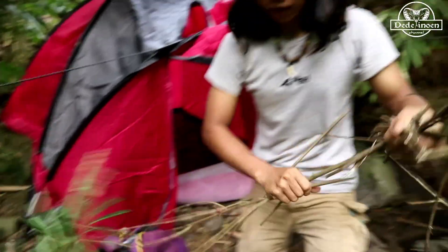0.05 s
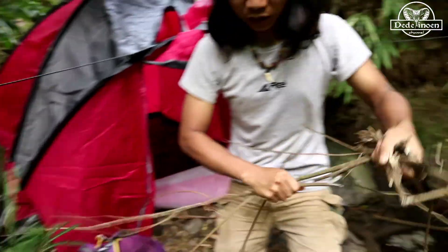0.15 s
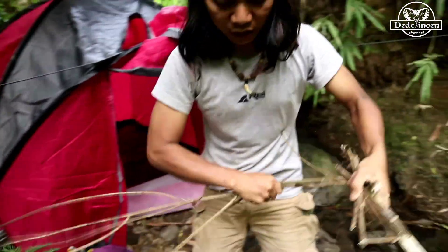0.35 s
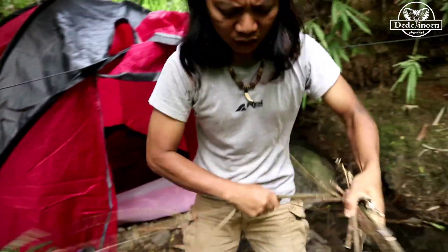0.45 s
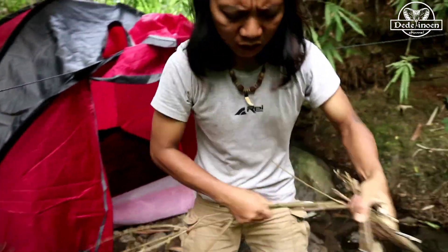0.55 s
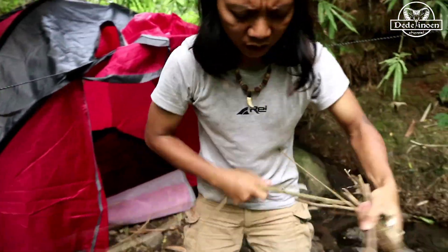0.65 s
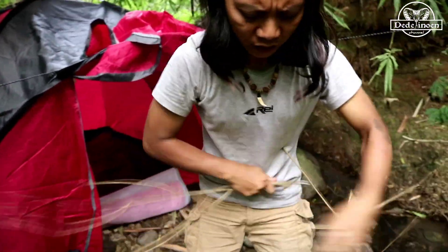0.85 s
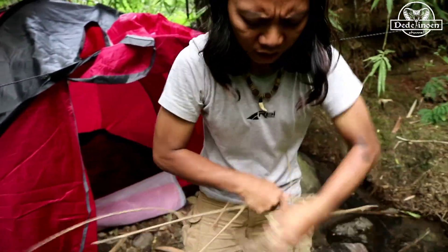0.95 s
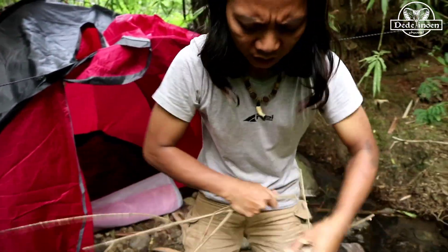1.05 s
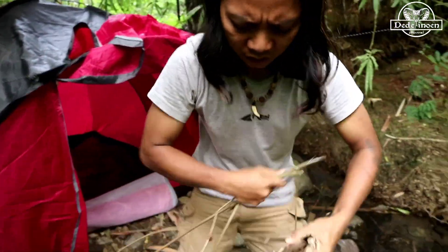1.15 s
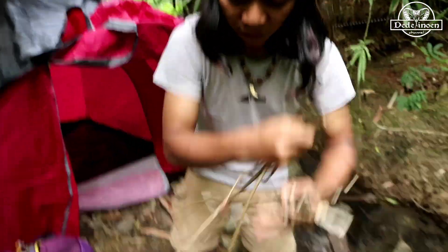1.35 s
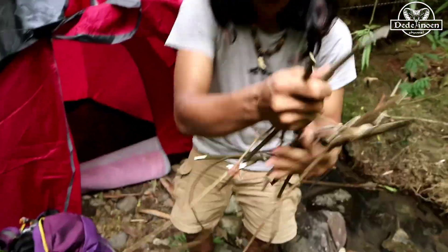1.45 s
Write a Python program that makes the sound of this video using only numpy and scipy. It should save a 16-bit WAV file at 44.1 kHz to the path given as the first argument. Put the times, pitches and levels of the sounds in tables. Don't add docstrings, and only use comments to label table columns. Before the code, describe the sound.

Dry twigs snap by hand very close to the microphone: one crack at once, a rapid cluster soon after, another loud break past one second, then small ticks and faint rustle over quiet forest hiss.

```python
import sys
import numpy as np
from scipy import signal
from scipy.io import wavfile
from scipy.ndimage import uniform_filter1d

SR = 44100
rng = np.random.default_rng(int(sys.argv[2]) if len(sys.argv) > 2 else 0)


def nominal_scale(level):
    x = np.asarray(level, float) / 20
    return 10 ** x


def store_pcm(level_fs):
    pcm = np.round(np.clip(level_fs, -1, 1) * 32767).astype(np.int16)
    wavfile.write(sys.argv[1], SR, np.atleast_2d(pcm).T)


N = 66150
LEAD = 2000

# pitch_hz, level_db (per Hz)
HISS_COLOUR = [(25, -18), (50, -9), (250, -1), (750, -2), (1400, -0.5), (5000, 0), (12000, -7.5),
               (16000, -13.5)]
BREAK_S = [-.012, .1785, .2069, .2163, .3265, .4294, .4327, .4922, .498, 1.0592, 1.0635, 1.0912, 1.094,
           .3274, .332, .2174, .3254, .2164, .4937, 1.0604]
# peak_db, ring_hz, tearing_s, splinter_db
BREAKS = [(2, 6470, 0.0041, -0.5), (-21, 5500, 0.0062, -13.5), (-10.5, 8200, .0004, 1.5),
          (2.5, 8500, 0.0052, 1.5), (-3, 10000, 0.00049, -5), (-20.5, 6300, 0.00022, -4),
          (-20, 13400, .0005, 5), (-15, 3000, 0.0016, -2.5), (-20, 3600, 0.0049, -8),
          (4.5, 9200, 0.00067, 8), (-11, 5120, 0.0075, -10), (-14, 9600, 0.0028, -8),
          (-21.5, 5600, 0.0095, -1), (-7.5, 5500, 0.0005, -5.5), (-21, 4600, 0.0028, -22),
          (0, 5070, 0.0004, -13), (-24, 9100, 0.0021, -21), (4.5, 13360, 0.0016, -10.5),
          (-10, 3200, 0.0005, 1), (-0.5, 2920, 0.00059, -5)]
# pitch_hz, level_db (per Hz)
SPLINTER_COLOUR = [(60, -35), (400, -20.5), (1500, -6), (4500, -3.5), (8000, -6), (14000, -5.5),
                   (16000, -12.5)]
KNOCK_S = [.0389, .0562, .1378, .149, .2005, .2125, .2872, .2065, .3715, .381, .3715, .5465, .5685, .6027,
           .647, .7815, .783, .802, .822, .844, .868, .965, .974, 1.0258, 1.1415, 1.2115, 1.301, 1.393,
           1.405, 1.4321, .548, .2885, 1.0925, 1.0915]
# peak_db, centre_hz, length_s
KNOCKS = [(-29, 12000, .00066), (-38, 7000, .0008), (-41, 4000, .00027), (-36.5, 3030, .0039),
          (-27, 9200, .0029), (-30, 7000, .0012), (-31.5, 1370, .0024), (-24, 8000, .0013),
          (-34, 7000, .0004), (-34, 6500, .0004), (-49, 894, .0011), (-37, 1050, .002), (-48.5, 520, .006),
          (-33, 5360, .00084), (-37.5, 4970, .001), (-28, 5300, .0015), (-46, 706, .0018),
          (-40, 5500, .001), (-37, 9100, 0.0014), (-37, 2500, .0038), (-46, 2200, .0033),
          (-38, 2430, .0015), (-35, 2260, .0017), (-40, 6000, .00044), (-33, 13000, .0006),
          (-33, 6000, .0012), (-34, 10500, 0.00082), (-46, 9000, .00063), (-43.5, 2404, 0.00074),
          (-38, 1580, .00037), (-43, 330, .003), (-50, 250, .002), (-14, 8930, .0005), (-22, 2300, .001)]
FIBRE_S = [.42945, .4732, .477, .485, .4885, .1794, .184, .175, .711, .547, .832, 1.033, 1.204, 1.32, 1.432,
           1.481, 1.2113, 1.0258, 1.4325, .7818, 1.3008, 1.4415]
# peak_db, centre_hz
FIBRES = [(-4, 6880), (-25, 7000), (-33, 14000), (-36, 10500), (-34, 14060), (-15.5, 6360), (-24, 5300),
          (-36, 6040), (-46, 2800), (-39, 14000), (-40, 7500), (-43, 13900), (-40, 4500), (-38, 4500),
          (-38, 13500), (-46, 1440), (-29, 3000), (-40, 3000), (-36, 3500), (-26, 5500), (-36, 5000),
          (-43, 3000)]
# break_index, peak_db, pitch_hz, t60_s
STEM_MODES = [(3, -14, 773, 0.016), (3, -10.5, 1213, 0.011), (3, -13, 1720, .012), (3, -24.5, 368, 0.018),
              (9, -3.5, 2297, 0.014), (9, -10, 993, 0.015), (9, -16.5, 530, .012), (7, -39, 450, 0.031),
              (7, -20, 1763, 0.013), (7, -44, 2130, 0.0068), (4, -27, 860, 0.012), (4, -23.5, 1330, 0.014),
              (4, -39.5, 600, 0.016), (9, -0.5, 3070, .012), (19, -5.5, 3125, .012), (9, -9.5, 4400, 0.02),
              (9, -7, 5300, 0.017), (9, -7, 5800, 0.021), (9, -14.5, 8470, 0.018), (9, -3.5, 10000, .01),
              (15, -2, 4960, .014), (3, -6.5, 7070, 0.032), (15, -9, 9550, 0.027), (15, -9, 4200, 0.019),
              (3, -27, 330, .01), (18, -22, 4010, 0.014), (18, -18, 2200, .007), (18, -18, 3000, 0.0055),
              (18, -20, 4900, .008), (19, -16, 800, .014), (3, -22, 560, .012), (5, -50, 420, .02),
              (4, -6, 6340, 0.0079), (4, -23, 2240, 0.0078), (4, -25, 3310, 0.011)]
# middle_s, half_length_s, level_db, centre_hz
DRAGS = [(0.084, 0.14, -60, 3050), (0.148, 0.018, -54.5, 9000), (0.186, 0.032, -53.5, 5500),
         (0.244, 0.028, -51.5, 760), (0.554, 0.066, -59, 4620), (0.549, 0.011, -53.5, 370),
         (0.608, 0.011, -55, 3860), (0.69, 0.017, -64, 4550), (0.741, 0.02, -78.5, 6000),
         (0.787, 0.015, -55, 2950), (0.836, 0.033, -54.5, 1900), (0.85, 0.024, -52, 3670),
         (0.879, 0.022, -52.5, 2380), (0.905, 0.014, -57.5, 7600), (0.943, 0.016, -60.5, 8700),
         (0.99, 0.0099, -58, 10000), (1.003, 0.014, -58, 9000), (1.099, 0.016, -48.5, 690),
         (1.147, 0.02, -49, 3010), (1.217, 0.038, -55, 3090), (1.317, 0.036, -58.5, 4120),
         (1.353, 0.013, -66, 4850), (1.422, 0.023, -62, 5000), (1.446, 0.024, -58.5, 8100),
         (1.467, 0.019, -68.5, 304), (1.492, 0.024, -57.5, 5460), (0.03, 0.06, -62, 450),
         (0.14, 0.04, -64, 500), (0.503, 0.008, -47, 4000), (0.602, 0.003, -52, 11000)]
# pitch_hz, level_db (per Hz)
LEAF_COLOUR = [(150, -35.5), (600, -0.5), (2300, -3), (6000, 0), (12000, -10.5), (16000, -5)]
# pitch_hz, t60_s
BUSH_T60 = [(300, .3), (1500, 0.4), (5000, 0.56), (10000, 0.41), (16000, 0.33)]
# pitch_hz, gain_db
ECHO_COLOUR = [(100, -5.5), (600, -6.5), (2000, -10), (5500, -4.5), (10000, -7), (16000, -4)]

RING_Q, TICK_Q, POP_Q = 1.71, 0.9, 1.5
SENT_Q = 0.79


def evened(x):
    return x / np.sqrt(np.mean(x ** 2) + 1e-20)


def colour(points):
    f, db = np.transpose(points)
    hz = np.abs(np.fft.fftfreq(4096, 1 / SR))
    gain_db = np.interp(np.log(hz + 1), np.log(f + 1), db)
    log_gain = np.log(nominal_scale(np.maximum(gain_db, -90)))
    phase = -signal.hilbert(log_gain).imag
    taps = np.fft.ifft(np.exp(log_gain + 1j * phase)).real[:2048]
    return taps / np.linalg.norm(taps)


def ring(x, hz, width_hz):
    r = np.exp(-np.pi * width_hz / SR)
    gain = np.sqrt(1 - r * r)
    return signal.lfilter([gain, 0, -r * gain], [1, -2 * r * np.cos(2 * np.pi * hz / SR), r * r], x)


def steep(x, hz, q):
    twice = ring(ring(x, hz, hz / q), hz, hz / q)
    return twice * np.sqrt(2 * hz / q / SR)


def impulse(length):
    return 1. * (np.arange(length) == 0)


def add(mix, start_s, sound):
    part = mix[..., round(start_s * SR) + LEAD:][..., :sound.shape[-1]]
    part += sound[..., :part.shape[-1]]


def place(mix, path, start_s, peak_db, drive, body, q):
    sound = body(drive, q)
    click = body(impulse(len(drive)), min(q, SENT_Q))
    sound = nominal_scale(peak_db) * sound / np.abs(sound).max()
    add(mix[0], start_s, sound)
    add(mix[1 + path % 3], start_s, click * np.linalg.norm(sound) / np.linalg.norm(click))


def break_paths():
    return np.argsort(np.argsort(BREAK_S))


def forest():
    noise = rng.standard_normal(N + LEAD)
    return nominal_scale(-60.5) * evened(signal.oaconvolve(noise, colour(HISS_COLOUR))[:N + LEAD])


def tear(length_s, chance):
    rise_s, sag_db, fall_db, fall_s, spiky_db = 0.00023, -6, -61.5, 0.011, 3.5
    t = np.arange(chance.shape[1]) / SR
    hold = sag_db * np.minimum(t / length_s, 1)
    fall = fall_db * np.maximum(t - length_s, 0) / (fall_s * np.sqrt(length_s / 0.0014))
    spikes = nominal_scale(spiky_db * evened(uniform_filter1d(chance[1], size=12)))
    return np.minimum(t / rise_s, 1) * nominal_scale(hold + fall) * chance[0] * spikes


def breaks(mix, chance):
    spray, paths = colour(SPLINTER_COLOUR), break_paths()
    for k, (start_s, (db, hz, length_s, splinter_db), c) in enumerate(zip(BREAK_S, BREAKS, chance)):
        thin = signal.butter(2, 0.19 * hz, "high", fs=SR)

        def twig(x, q):
            splinters = signal.oaconvolve(x, spray)[:len(x)]
            return signal.lfilter(*thin, steep(x, hz, q) + nominal_scale(splinter_db) * splinters)

        place(mix, paths[k], start_s, db, tear(length_s, c), twig, RING_Q)


def ticks(mix, chance):
    for k, (start_s, (db, hz, length_s), c) in enumerate(zip(KNOCK_S, KNOCKS, chance)):
        place(mix, k, start_s, db, tear(length_s, c), lambda x, q: steep(x, hz, q), TICK_Q)


def pops(mix):
    for k, (start_s, (db, hz)) in enumerate(zip(FIBRE_S, FIBRES)):
        place(mix, k, start_s, db, impulse(600), lambda x, q: steep(x, hz, q), POP_Q)


def twigs():
    mix = np.zeros((4, N + LEAD))
    chance = rng.standard_normal((80, 2, 1800))
    breaks(mix, chance)
    ticks(mix, chance[20:])
    pops(mix)
    return mix


def stems():
    mix, t, paths = np.zeros((4, N + LEAD)), np.arange(1500) / SR, break_paths()
    for k, db, hz, t60_s in STEM_MODES:
        swell = np.minimum(t / .0007, 1)
        mode = nominal_scale(db - 60 * t / t60_s) * np.sin(2 * np.pi * hz * t) * swell
        click = steep(impulse(len(t)), hz, SENT_Q)
        add(mix[0], BREAK_S[k], mode)
        sent = nominal_scale(-6) * click * np.linalg.norm(mode) / np.linalg.norm(click)
        add(mix[1 + paths[k] % 3], BREAK_S[k], sent)
    return mix


def rustle():
    grains_per_s, grain_db, wide_db, q = 4500, 2.3, 0.1, 0.71
    n, out = N + LEAD, np.zeros(N + LEAD)
    size = nominal_scale(grain_db * np.minimum(rng.exponential(1, n), 4)) * (rng.random(n) < grains_per_s / SR)
    grain_decay = nominal_scale(-60 * np.arange(400) / SR / 0.0013)
    grains = signal.oaconvolve(size, grain_decay)[:n] * rng.standard_normal(n)
    wide = signal.oaconvolve(grains, colour(LEAF_COLOUR))[:n]
    for middle_s, half_s, db, hz in DRAGS:
        first, length = round((middle_s - half_s) * SR) + LEAD, round(2 * half_s * SR)
        part = slice(first, first + length)
        rubbing = ring(ring(grains[part], hz, hz / q), hz, hz / q)
        scrape = evened(rubbing) + nominal_scale(wide_db) * evened(wide[part])
        add(out, middle_s - half_s, nominal_scale(db) * scrape * np.hanning(length)[:len(scrape)])
    return out


def camp(x):
    near_db, near_t60_s, far_db, gap_s = -16, 0.13, -24, 0.0022
    t = np.arange(SR // 2) / SR
    taps, wash, lumps = rng.standard_normal((3, len(t)))
    near = taps * nominal_scale(3.4 * evened(uniform_filter1d(lumps, size=30)) - 60 * t / near_t60_s)
    hz, at, z = signal.stft(wash, SR, nperseg=128)
    f, t60 = np.transpose(BUSH_T60)
    t60_s = np.interp(np.log(hz + 1), np.log(f), t60)[:, None]
    far = signal.istft(z * nominal_scale(-60 * at / t60_s), SR, nperseg=128)[1][:len(t)]
    tail = nominal_scale(near_db) * near / np.linalg.norm(near) + nominal_scale(far_db) * far / np.linalg.norm(far)
    tail = tail * np.clip(t / gap_s - .5, 0, 1)
    return signal.fftconvolve(x, signal.oaconvolve(tail, colour(ECHO_COLOUR)))[:len(x)]


def scene():
    direct, *sent = twigs() + stems()
    leaves = rustle()
    echoes = sum(camp(path) for path in sent) + camp(leaves)
    return (direct + leaves + echoes + forest())[None, LEAD:]


def low_pass(x):
    return signal.sosfilt(signal.butter(12, 16680, fs=SR, output="sos"), x)


def record(dry):
    ceiling, bass_hz, shelf_hz, shelf_db = 0.98, 112, (15350, 16400), -28
    hot = np.clip(dry, -ceiling, ceiling)
    hot = signal.lfilter(*signal.butter(1, bass_hz, "high", fs=SR), hot)

    def below(hz):
        taps = signal.firwin(255, hz, window=("kaiser", 8), fs=SR)
        return signal.oaconvolve(hot, taps[None], "same")

    low, top = below(shelf_hz[0]), below(shelf_hz[1])
    return low_pass(low + nominal_scale(shelf_db) * (top - low))


dry = scene()
out = record(dry)
store_pcm(out)
```